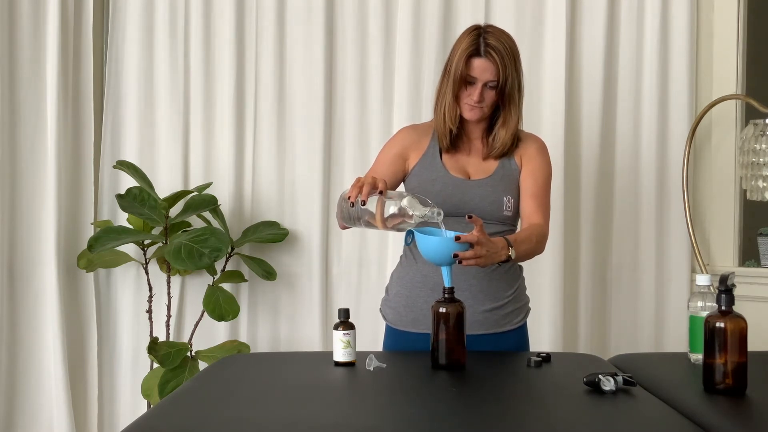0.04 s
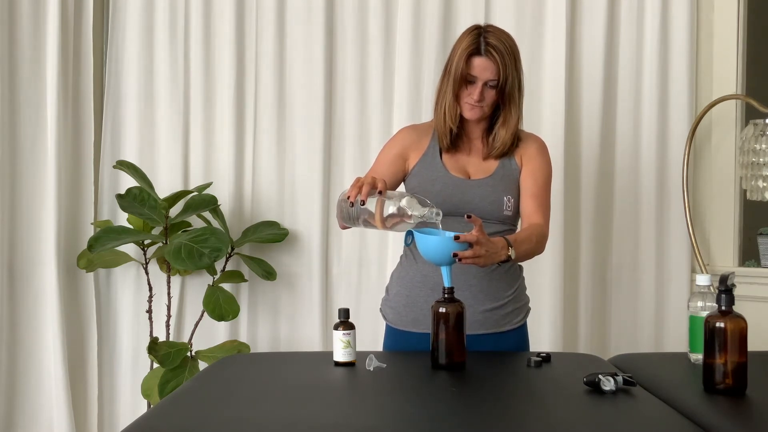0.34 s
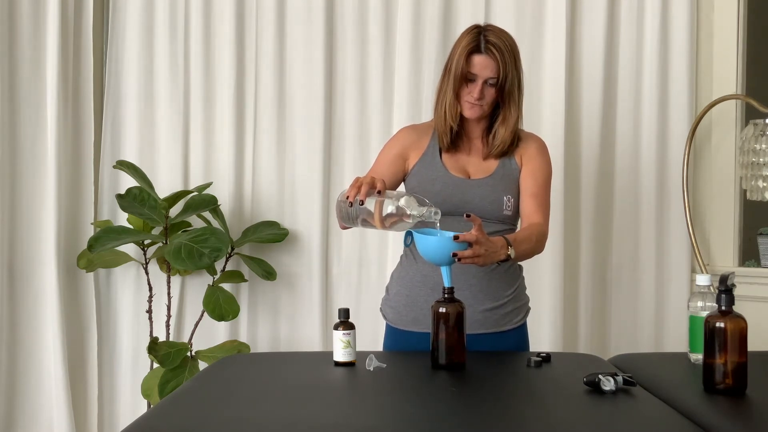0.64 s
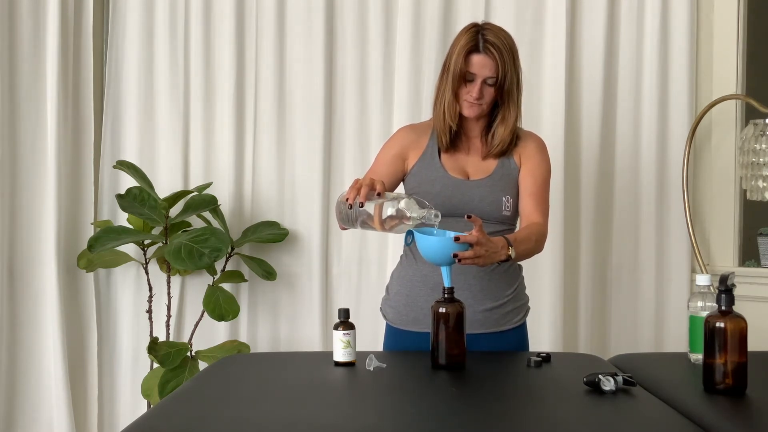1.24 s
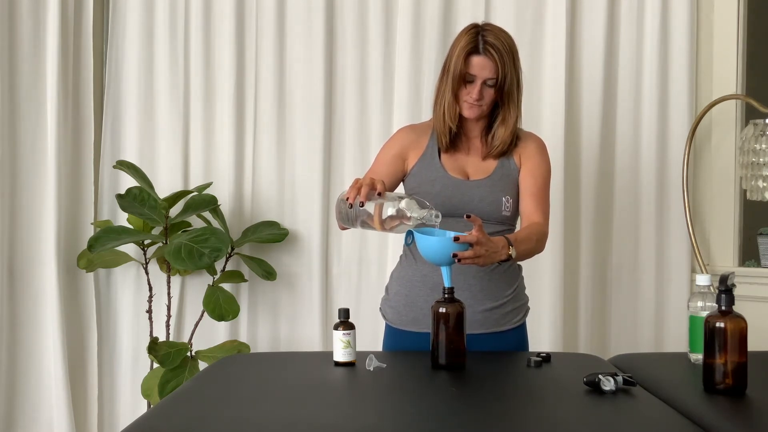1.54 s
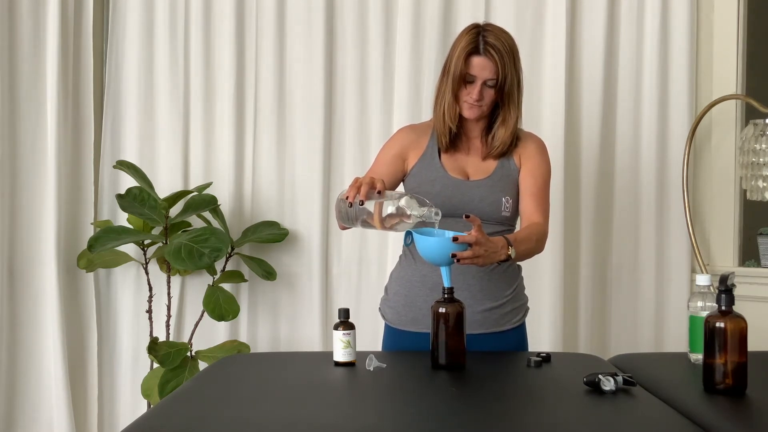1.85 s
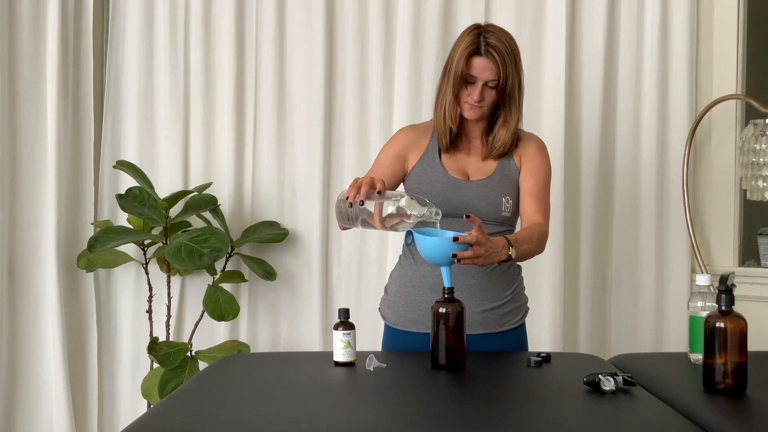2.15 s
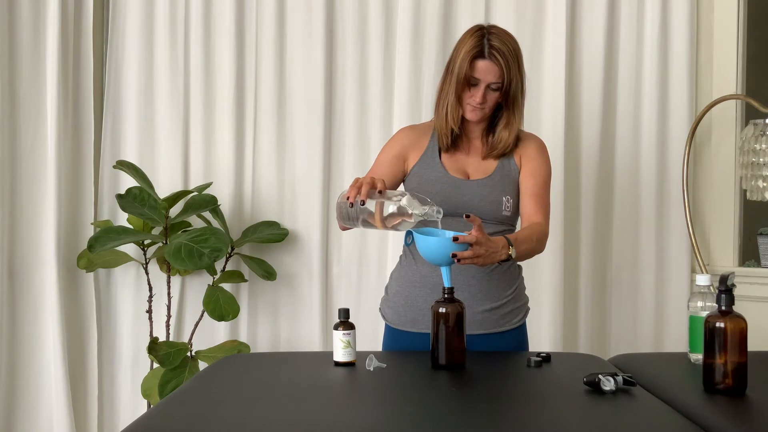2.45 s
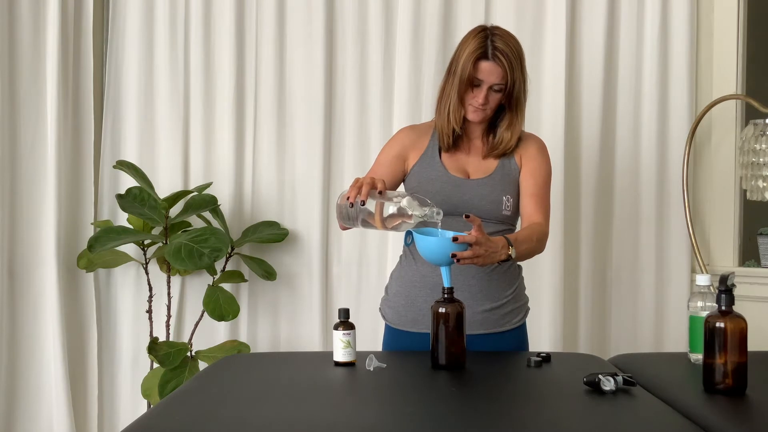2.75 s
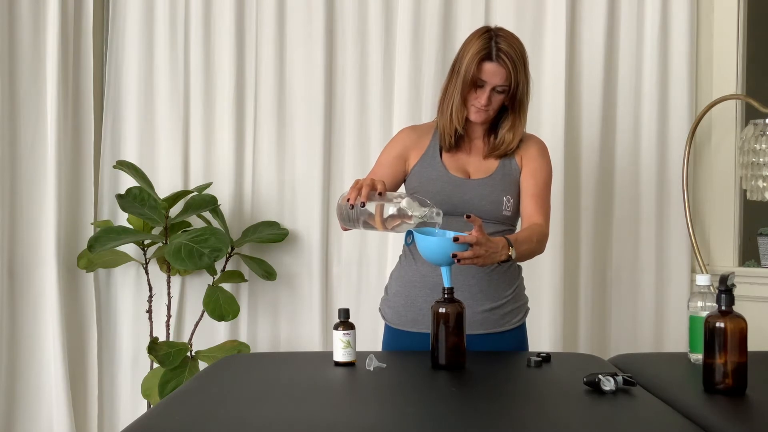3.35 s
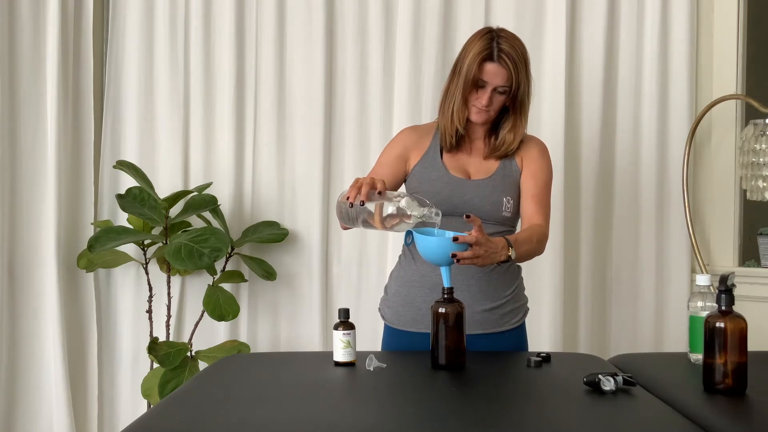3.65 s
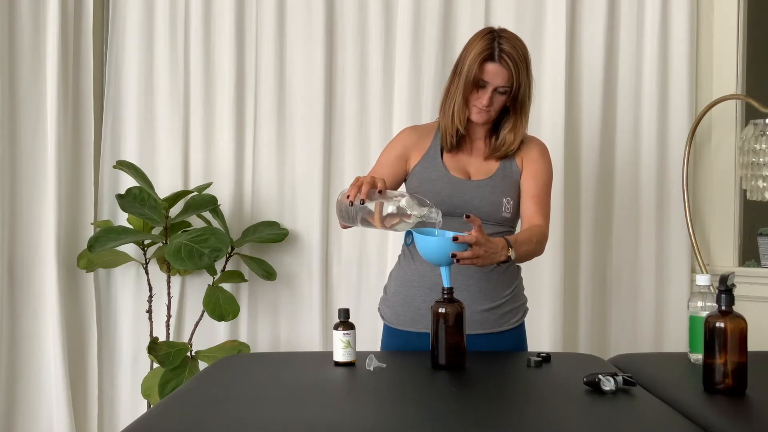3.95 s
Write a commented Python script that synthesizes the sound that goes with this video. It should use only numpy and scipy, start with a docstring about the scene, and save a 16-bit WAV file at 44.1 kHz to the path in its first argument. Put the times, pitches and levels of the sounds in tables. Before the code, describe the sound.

Liquid splashes and drips softly through a plastic funnel into glass, a low drone swelling behind.

```python
"""Thin pour into a glass bottle

A thin stream runs through a plastic funnel into a glass bottle in a small room. It splashes in little spurts,
ticks as bubbles burst, fizzes, and traps bubbles that ring briefly. Behind it a low drone, like a distant
engine passing, swells and sinks in pitch over the room's rumble."""
import sys
import numpy as np
from scipy import signal
from scipy.fft import rfft, irfft
from scipy.io import wavfile
from scipy.ndimage import map_coordinates

SR = 44100
rng = np.random.default_rng(int(sys.argv[2]) if len(sys.argv) > 2 else 0)


def dump(signal):
    """Clip the signal to [-1, 1] and save it as 16-bit WAV at the path in sys.argv[1]."""
    limited = np.clip(np.atleast_2d(signal).T, -1, 1)
    pcm = np.round(limited * 32767).astype(np.int16)
    wavfile.write(sys.argv[1], SR, pcm)


N = 176400
TIME = np.arange(N) / SR

# tone of the room's rumble: f/Hz, relative level/dB
RUMBLE_EQ = [(20, -23.5), (35, -18), (50, -4), (60, -5), (76, 8), (88, 1), (103, 4.5), (120, -8),
             (145, -2.5), (175, -7.5), (205, -8), (260, -11.5), (330, -16.5), (370, -19), (410, -19),
             (550, -27), (800, -72)]
# tone of the room's air: f/Hz, relative level/dB
AIR_EQ = [(300, 1.5), (500, 3.5), (750, 4.5), (1000, 2), (1300, 3), (1700, -0.5), (2100, -10), (2600, -13),
          (4000, -22.5), (7000, -15.5), (9000, -48.5), (16000, -33)]
# fader ride on the air: t/s, level/dB
AIR_LEVEL = [(0, -58.5), (1, -60), (1.9, -60), (2.3, -58), (3, -58.5), (3.4, -58), (4, -58.5)]
# how alike the room tone is left and right: f/Hz, correlation
ROOM_CORRELATION = [(30, 0.82), (100, 0.91), (200, 0.76), (330, 0.85), (500, 0), (770, 0), (1200, 0.67),
                    (1800, 0.37), (2600, 0.16), (16000, 0)]
# lean of the room tone: f/Hz, left minus right/dB
ROOM_BALANCE = [(60, -3), (130, 5.5), (260, 4), (550, 3.5), (1000, 1.5), (2000, -4), (8000, 0)]
# phase between the microphone ports: f/Hz, left minus right/rad
PORT_PHASE = [(1000, 0), (2000, -1.5), (2700, -3.6), (3000, -4.7), (3800, -6.2), (5000, -6.9), (6500, -7.4),
              (8000, -8.3), (9000, -9.3), (10200, -9.5), (11000, -10), (12000, -11), (13200, -11.9),
              (14000, -12.5), (16000, -12.6)]
# glide of the drone's main tone: t/s, f/Hz
DRONE_PITCH = [(0, 101.5), (.5, 101), (1, 100.5), (1.5, 98), (2, 97.5), (2.5, 95), (3, 94.5), (3.5, 92),
               (4, 88.5)]
# swell of that tone: t/s, level/dB
DRONE_LEVEL = [(0, -41.5), (.9, -43), (1.2, -38.5), (1.5, -31.5), (1.8, -28.5), (2.03, -23.5), (2.3, -25.5),
               (2.55, -22.5), (2.72, -21), (2.87, -24.5), (2.98, -32.5), (3.05, -34), (3.17, -22.5),
               (3.3, -23), (3.46, -31), (3.6, -24.5), (3.75, -27), (3.88, -20), (4, -29.5)]
# the drone's other partials: multiple of the main tone, top level/dB, t of the top/s, half length/s
DRONE_PARTIALS = [(0.493, -60, 0.77, 0.82), (1.501, -38.5, 0.11, 0.29), (1.488, -45, 1.54, 0.49),
                  (1.506, -48.5, 3, 1.1), (1.667, -43.5, 1.65, 0.51), (1.675, -39, 2.91, 0.27),
                  (1.997, -47.5, 3.14, 0.4), (1.992, -41, 3.82, 0.079), (1.4, -42, 1.18, 0.057),
                  (2.504, -50, 0.6, 0.11), (2.48, -50.5, 1.007, 0.098), (2.492, -56.5, 3.2, 0.43),
                  (2.66, -56.5, 1.33, .4), (2.813, -55, 3.1, 0.49), (3, -59, 2.04, 0.23),
                  (3.16, -57, 0.92, 0.14), (3.16, -57, 1.35, 0.16), (3.81, -65, .85, 0.41)]
# soft hollow gurgles: centre t/s, level/dB, f/Hz
GURGLES = [(.22, -55.5, 412), (.93, -58.5, 418), (1.669, -53, 410), (2.38, -56, 465), (2.645, -60, 1198),
           (2.925, -61, 1200)]
# bottle notes that linger for a moment: centre t/s, level/dB, f/Hz, half length/s
BOTTLE_NOTES = [(0.234, -69, 3010, 0.033), (1.028, -76, 3015, .05), (1.35, -67, 2990, 0.026),
                (1.474, -75, 5300, 0.026), (2.307, -75.5, 3390, 0.11), (2.486, -72, 5350, 0.13),
                (3.185, -68.5, 2610, 0.036), (3.64, -64.5, 5760, 0.02), (3.716, -62.5, 6280, 0.012)]
# strength of the stream: t/s, level/dB
STREAM_LEVEL = [(0.0, -67.5), (0.17, -71.5), (0.3, -65.5), (0.6, -67.5), (0.89, -71), (0.99, -64),
                (1.11, -72), (1.86, -69), (2.33, -76), (2.85, -69), (2.95, -67.5), (3.12, -77.5),
                (4.0, -70)]
# bubbles that burst at once: t/s, level/dB, f/Hz, length/s
BURSTING_BUBBLES = [(0.0838, -43.5, 5140, 0.00089), (2.3683, -50.5, 5210, .001), (0.9693, -38, 4400, 0.0013),
                    (0.9712, -49, 4140, 0.0018), (1.1575, -46, 4170, 0.0023), (1.8425, -42, 4150, 0.003),
                    (2.5041, -40, 4680, 0.00084), (2.5052, -44, 4250, 0.0024), (2.631, -53, 4370, .0018),
                    (2.8423, -46.5, 5500, 0.001), (2.845, -46.5, 4280, 0.0026), (3.035, -48, 5800, .0016),
                    (3.102, -49.5, 4340, 0.0023), (3.258, -56.5, 5520, 0.0014), (3.538, -52.5, 3890, .0012),
                    (3.7058, -46.5, 5900, 0.0013), (2.811, -46.5, 8100, 0.0017), (3.836, -61.5, 3900, 0.00084)]
# featured bubbles: t/s, relative level/dB, f/Hz, decay/cycles, attack/s
BUBBLES = [(0.0866, -49, 5600, 120, 0.00067), (0.0963, -46.5, 3500, 45, 0.00037),
           (0.1452, -49.5, 3200, 104, 0.0011), (0.1785, -48.5, 4480, 74, .0006),
           (0.2032, -37, 2946, 54, 0.00055), (0.254, -56, 4500, 32, .0005),
           (0.2876, -50, 4660, 60, 0.00054), (0.348, -52, 4170, 55, .0005), (0.358, -51, 3900, 40, 0.00065),
           (0.372, -54, 4650, 45, .0005), (0.436, -57, 4400, 45, .0005), (0.479, -55, 5730, 50, .0005),
           (0.546, -49, 5200, 46, .0005), (0.562, -54, 4570, 45, 0.00046), (0.623, -48.5, 4600, 54, .0005),
           (0.633, -59, 4300, 45, 0.00054), (0.6533, -49, 4690, 55, .0005), (0.678, -55, 3520, 41, 0.00055),
           (0.7146, -52, 3930, 55, .0005), (0.904, -46.5, 4770, 76, 0.00046),
           (0.9696, -44.5, 3060, 110, .0005), (1.049, -55, 3000, 45, .0005),
           (1.088, -51, 3060, 130, 0.0012), (1.2436, -63, 3830, 55, 0.00063),
           (1.319, -43.5, 2890, 53, .001), (1.438, -45, 5210, 71, .0006), (1.647, -50, 4320, 50, 0.00064),
           (1.855, -50, 2920, 59, 0.00067), (1.984, -52, 2910, 52, 0.00082),
           (2.114, -45.5, 3830, 45, 0.00054), (2.2293, -46, 4160, 47, 0.00077),
           (2.328, -47.5, 3520, 73, 0.00076), (2.3702, -55, 3420, 94, 0.0007),
           (2.3798, -52.5, 5170, 86, 0.00053), (2.255, -47, 5170, 110, 0.00063),
           (2.4995, -41.5, 5430, 92, 0.00096), (2.6467, -45, 2770, 130, .0012),
           (2.798, -49, 3500, 79, .001), (2.7985, -48, 5200, 90, .0006), (2.829, -48, 2980, 81, .001),
           (2.8705, -49, 4360, 89, .0008), (2.983, -48, 4320, 85, 0.00091), (3.1, -50, 3170, 62, .0008),
           (3.1555, -41, 2610, 60, .004), (3.277, -48, 6970, 70, 0.00087), (3.3745, -47, 3180, 83, 0.0012),
           (3.391, -49, 4180, 60, .0007), (3.422, -46.5, 4290, 124, 0.0011), (3.561, -51, 2400, 59, 0.0013),
           (3.584, -53, 4680, 55, .0007), (3.6121, -52.5, 6400, 59, .0005), (3.623, -47, 5600, 75, .001),
           (3.701, -47.5, 3070, 50, 0.00075), (3.871, -47, 4650, 67, 0.00066),
           (3.9843, -42.5, 3280, 54, 0.00057)]
# resonances of funnel and bottle neck: f/Hz, level/dB, decay/cycles
FUNNEL_MODES = [(1997, -13.5, 31), (2340, -18.5, 49), (2967, -26.5, 110), (4250, -23, 99),
                (4680, -31.5, 130), (5370, -32.5, 180), (6856, -22, 390), (8210, -22.5, 220),
                (10640, -22, 160)]
# tone of the fizz between spurts: f/Hz, relative level/dB
FIZZ_EQ = [(2500, -12), (4500, -3.5), (7000, -16), (10000, -16.5), (13000, -14), (15000, -7.5)]
# EQ over spurts and fizz together: f/Hz, gain/dB
SPLASH_EQ = [(2000, -6), (2600, -2.5), (3100, -4.5), (3700, -9.5), (4300, -4), (5500, -5), (7000, -1.5),
             (10000, -1.5), (12000, 4), (14500, -8), (16000, 1.5)]
# the spurts' low, mid and high anchors: f/Hz
SPURT_HZ = [5000, 9000, 13000]
# how long the spray hangs at each anchor: time constant/s
SPRAY_TAIL_S = [0.042, 0.054, 0.048]
# spurts landing in the funnel: t/s, low, mid and high level before EQ/dB, spray against burst/dB
SPURTS = [(0.084, -65, -44.5, -57, -12.5), (0.097, -61.5, -75, -79, -1), (0.193, -55.5, -56, -59.5, -7),
          (0.203, -61, -54, -67, -14), (0.345, -62, -65, -87, -6), (0.372, -59, -64, -86, -9),
          (0.428, -57, -66, -65.5, -4.5), (0.535, -54.5, -53, -54, -13), (0.555, -59.5, -81, -64, -15),
          (0.655, -57, -74, -70, -1.5), (0.72, -48, -71, -59, -11), (0.766, -61, -74, -69, -1.5),
          (0.902, -63, -61, -76, -2.5), (0.944, -57, -50, -50.5, -15), (0.968, -45, -72, -74, -17),
          (1.047, -51.5, -59.5, -60, -13), (1.157, -55, -61, -72, -6.5), (1.2, -65.5, -77, -77, 5.5),
          (1.245, -57.5, -81, -86, 1.5), (1.281, -58, -70, -60, -13), (1.33, -48, -70, -48.5, -17),
          (1.437, -62, -65, -55, -18), (1.511, -59.5, -68, -57.5, -1.5), (1.568, -55.5, -68, -68, -3.5),
          (1.618, -50.5, -73, -78, -6), (1.646, -52.5, -61, -55, -13), (1.841, -55, -63.5, -63, -8),
          (1.87, -58.5, -64, -76, -3), (1.977, -57.5, -60, -91, -8.5), (2.111, -59.5, -57, -79, -4.5),
          (2.163, -55, -75.5, -66.5, -4.5), (2.228, -50.5, -63.5, -54, -7), (2.256, -60, -60, -56, -18),
          (2.37, -56, -55.5, -66, -14.5), (2.45, -65.5, -68.5, -76.5, 0), (2.501, -51, -51, -55, -12.5),
          (2.555, -55.5, -70, -73, -5.5), (2.592, -60, -79.5, -55.5, -13.5),
          (2.618, -59.5, -68, -66, -17.5), (2.71, -78, -61.5, -75, -2), (2.752, -56.5, -67.5, -61.5, -4.5),
          (2.797, -57.5, -59.5, -68.5, -4.5), (2.845, -67, -61, -62.5, -4.5), (2.868, -58.5, -61, -65, -10),
          (3.036, -53.5, -65.5, -57.5, -1.5), (3.074, -56.5, -63, -60, -9), (3.101, -44, -73.5, -51, -19.5),
          (3.257, -63.5, -66.5, -70.5, -4), (3.349, -58.5, -81, -72, -1.5), (3.392, -55, -76, -63, -2.5),
          (3.43, -59, -77, -62.5, -13), (3.535, -87, -56, -88, -12.5), (3.613, -67.5, -70, -92, -1),
          (3.65, -62, -73, -73, 1), (3.698, -55.5, -77, -58, -8.5), (3.836, -84, -63, -62.5, -11),
          (3.871, -61, -68, -65.5, -2), (3.957, -53, -71, -62.5, -4)]

RUMBLE_DB = -42
ROOM_T60_S, REVERB_DB, WIDTH_DB = 0.18, -4.5, -18
DRONE_WAVER_DB, PARTIAL_WAVER_DB = 1, 0.5
GURGLE_WIDTH_S = 0.022
SMALL_BUBBLE_DB, SMALL_LOW_HZ, SMALL_HIGH_HZ = -75.5, 2720, 6155
BUBBLE_TRIM_DB, BUBBLE_MIN_CYCLES = 2.5, 40
BUBBLE_RISE, BUBBLE_FLUTTER = 0.018, 0.25   # shares of pitch and of amplitude
BURST_ATTACK_S, BURST_DECAY_S, SPRAY_ATTACK_S = 0.0006, 0.0039, 0.0041
CRACKLE_DB, GRAIN_DB = -1.5, -0.5


def from_db(db):
    """Decibels to gain."""
    return 10 ** (np.asarray(db) / 20)


def unit_rms(x):
    """Scale to unit rms."""
    return x / np.sqrt(np.mean(x ** 2) + 1e-20)


def automation(points):
    """Breakpoints in time, joined by straight lines."""
    return np.interp(TIME, *np.transpose(points))


def per_bin(points):
    """A curve over log frequency, read at every Fourier bin."""
    hz, value = np.transpose(points)
    return np.interp(np.log(np.arange(N // 2 + 1) * SR / N + 1e-9), np.log(hz), value)


def drift(per_s):
    """Smooth random modulation with unit rms."""
    knots = rng.standard_normal(int(per_s * N / SR) + 2)
    return unit_rms(map_coordinates(knots, [TIME * per_s], order=2, mode="nearest"))


def clicks(per_s, spread_db):
    """Random clicks of uneven size."""
    sizes = from_db(spread_db * np.minimum(rng.exponential(1, N), 4)) * rng.choice([-1, 1], N)
    return sizes * (rng.random(N) < per_s / SR)


def ring(x, hz, cycles):
    """A resonance that falls 60 dB in so many cycles; a click gives it unit energy."""
    radius, angle = np.exp(-np.log(1000) * hz / (cycles * SR)), 2 * np.pi * hz / SR
    feed = np.sqrt((1 - radius ** 2) / 2) * np.array([1, 0, -1])
    return signal.lfilter(feed, [1, -2 * radius * np.cos(angle), radius ** 2], x + 1e-18)


def room_tone(eq):
    """A bed of diffuse stereo noise, most alike left and right in the bass."""
    mid, side = rfft(rng.standard_normal((2, N)))
    alike, sign = per_bin(ROOM_CORRELATION), np.array([[1], [-1]])
    pair = np.sqrt(1 + alike) * mid + sign * np.sqrt(1 - alike) * side
    gain = from_db(per_bin(eq) + sign * per_bin(ROOM_BALANCE) / 2)
    return unit_rms(irfft(pair * gain, N))


def reverb(x):
    """The small room's dense tail, with unit energy."""
    t = TIME[:SR // 2]
    tail = rng.standard_normal(len(t)) * from_db(-60 * t / ROOM_T60_S) * (t > .003)   # 3 ms pre-delay
    return signal.fftconvolve(x, tail / np.sqrt(np.sum(tail ** 2)))[:N]


def ports(x):
    """The two microphone ports hear a near sound out of step."""
    phase = np.interp(np.arange(N // 2 + 1) * SR / N, *np.transpose(PORT_PHASE))
    return np.array([x, irfft(rfft(x) * np.exp(-1j * phase), N)])


def drone():
    """A low, engine-like hum sinks in pitch while its partials swell and fade in turn."""
    phase = 2 * np.pi * np.cumsum(automation(DRONE_PITCH)) / SR
    out = from_db(automation(DRONE_LEVEL) + DRONE_WAVER_DB * drift(per_s=9)) * np.sin(phase)
    for multiple, db, top, half in DRONE_PARTIALS:
        gain = from_db(db + PARTIAL_WAVER_DB * drift(per_s=5.1))
        swell = 1 / np.hypot(1, np.abs((TIME - top) / half) ** 1.83)
        out += gain * swell * np.sin(multiple * phase + rng.uniform(0, 2 * np.pi))
    return np.sqrt(2) * out


def gurgles():
    """Faint hollow tones swell and fade under the pour."""
    out = np.zeros(N)
    for centre, db, hz in GURGLES:
        swell = np.exp(-((TIME - centre) / GURGLE_WIDTH_S) ** 2 / 2)
        out += from_db(db) * swell * np.sin(2 * np.pi * hz * TIME)
    return out


def bottle_notes():
    """The stream keeps a narrow resonance fluttering for a moment, now at one pitch, now at another."""
    stir, out = rng.standard_normal(N), np.zeros(N)
    for centre, db, hz, half in BOTTLE_NOTES:
        swell = from_db(db) / (1 + ((TIME - centre) / half) ** 4)
        out += swell * unit_rms(ring(stir, hz, cycles=130))
    return out


def small_bubbles():
    """Many faint bubbles of random size ring under the stream."""
    pitches = np.geomspace(SMALL_LOW_HZ, SMALL_HIGH_HZ, 28)
    births = clicks(per_s=110, spread_db=1.5)
    pitch_index = rng.integers(0, len(pitches), N)
    rings = sum(ring(births * (pitch_index == k), hz, cycles=45) for k, hz in enumerate(pitches))
    return from_db(SMALL_BUBBLE_DB) * unit_rms(rings * from_db(automation(STREAM_LEVEL)))


def bursting_bubbles():
    """Each bubble that bursts gives a tick of a few cycles that stops short."""
    out = np.zeros(N + SR)
    for onset, db, hz, length in BURSTING_BUBBLES:
        t, start = TIME[:int(length * SR)], int(onset * SR)
        envelope = from_db(db) * np.sin(np.pi * t / length)
        out[start:start + len(t)] += envelope * np.sin(2 * np.pi * hz * t)
    return out[:N]


def bubbles():
    """Trapped bubbles ring as fluttering, dying sines that bend slightly upward."""
    out, t = np.zeros(N + SR), TIME[:SR // 10]
    for onset, db, hz, cycles, attack in BUBBLES:
        life = t * hz / max(cycles, BUBBLE_MIN_CYCLES)   # reaches 1 at 60 dB down
        pitch = hz * (1 + BUBBLE_RISE * np.minimum(life, 1))
        envelope = from_db(db + BUBBLE_TRIM_DB - 60 * life) * (1 - np.exp(-t / attack))
        start = int(onset * SR)
        out[start:start + len(t)] += envelope * np.sin(2 * np.pi * np.cumsum(pitch) / SR)
    return out[:N] * (1 + BUBBLE_FLUTTER * drift(per_s=450))


def funnel(x):
    """Adds the faint ringing that the splashing stirs in funnel and bottle neck."""
    return x + sum(from_db(db) * ring(x, hz, cycles) for hz, db, cycles in FUNNEL_MODES)


def splash_power(hz):
    """Power envelope of one band: each spurt is a sharp burst and a tail of spray, over the fizz."""
    power, t = np.zeros(N + SR), TIME[:SR // 4]
    power[:N] = from_db(automation(STREAM_LEVEL) + np.interp(hz, *np.transpose(FIZZ_EQ))) ** 2
    burst = (1 - np.exp(-t / BURST_ATTACK_S)) * np.exp(-t / BURST_DECAY_S)
    spray = (1 - np.exp(-t / SPRAY_ATTACK_S)) * np.exp(-t / np.interp(hz, SPURT_HZ, SPRAY_TAIL_S))
    for onset, *levels, spray_db in SPURTS:
        envelope = from_db(np.interp(hz, SPURT_HZ, levels)) * (burst + from_db(spray_db) * spray)
        start = int(onset * SR)
        power[start:start + len(t)] += envelope ** 2
    return power[:N]


def splashes():
    """Liquid landing in the funnel breaks into crackle and grains, the pings of tiny bubbles."""
    edges, out = np.geomspace(2000, 16000, 17), np.zeros(N)
    for low, high in zip(edges, edges[1:]):
        hz, width = np.sqrt(low * high), high - low
        eq = from_db(np.interp(hz, *np.transpose(SPLASH_EQ)))
        force = eq * np.sqrt(splash_power(hz) * width / SPURT_HZ[0])
        band = signal.butter(2, [low, high], "band", fs=SR, output="sos")
        impacts = force * unit_rms(clicks(per_s=700, spread_db=3.8))
        crackle = signal.sosfilt(band, impacts + 1e-18) * np.sqrt(SR / 2 / width)   # make-up gain
        grains = [ring(force * unit_rms(clicks(per_s=21, spread_db=3.5)), pitch, cycles=85)
                  for pitch in np.linspace(low, high, 6, endpoint=False)]
        out += from_db(CRACKLE_DB) * crackle + from_db(GRAIN_DB) * sum(grains) / np.sqrt(len(grains))
    return out


def scene():
    """The pour and its reverb sit up front; drone and room tone lie behind."""
    pour = funnel(splashes() + small_bubbles()) + bubbles() + bursting_bubbles() + bottle_notes()
    near = ports(pour + gurgles() + from_db(REVERB_DB) * reverb(pour))
    wide = from_db(WIDTH_DB) * np.array([reverb(pour), reverb(pour)])
    hum = drone()
    rumble = from_db(RUMBLE_DB) * room_tone(RUMBLE_EQ)
    air = from_db(automation(AIR_LEVEL)) * room_tone(AIR_EQ)
    return near + wide + hum + rumble + air


def record(dry):
    """A steep high cut at 15.8 kHz."""
    return signal.sosfilt(signal.ellip(10, .2, 80, 15800, fs=SR, output="sos"), dry)


dry = scene()
out = record(dry)
dump(out)
```